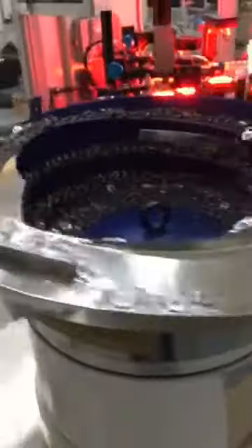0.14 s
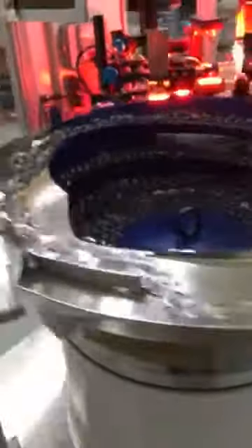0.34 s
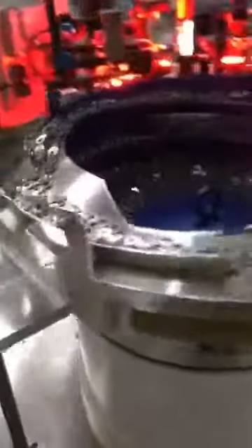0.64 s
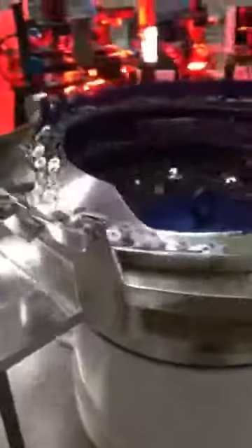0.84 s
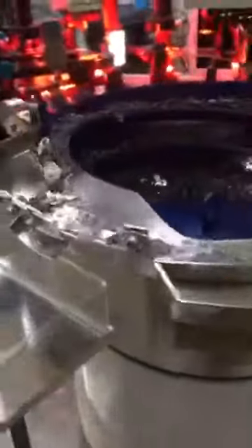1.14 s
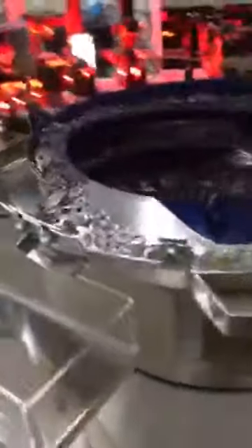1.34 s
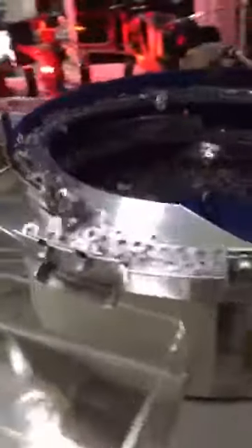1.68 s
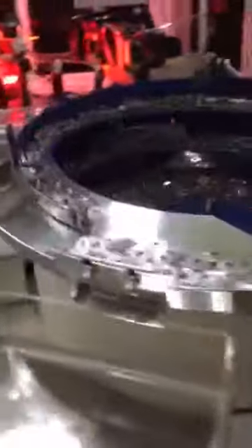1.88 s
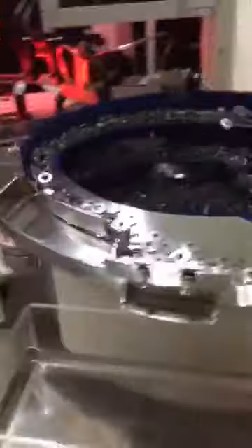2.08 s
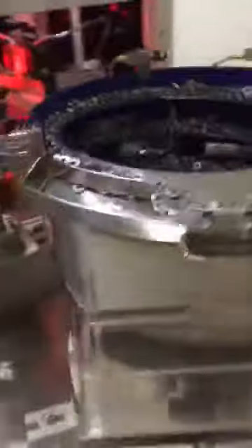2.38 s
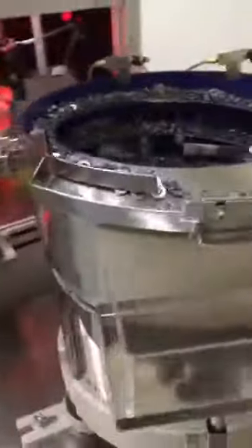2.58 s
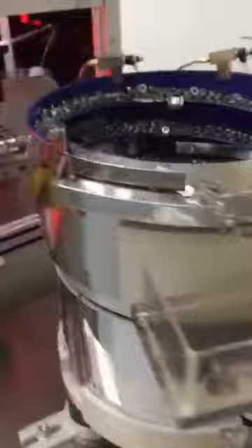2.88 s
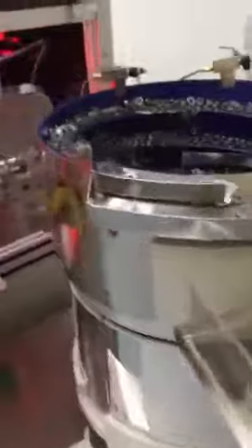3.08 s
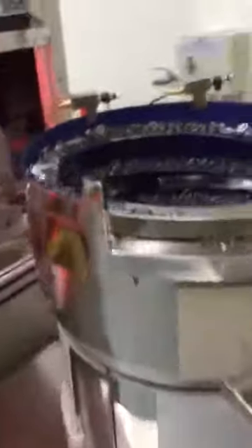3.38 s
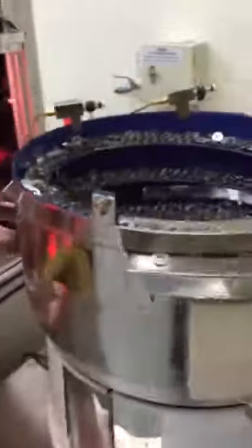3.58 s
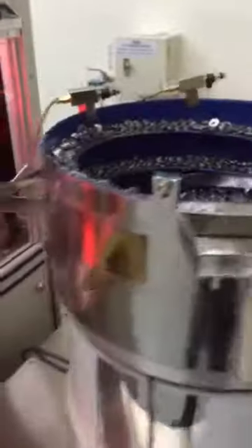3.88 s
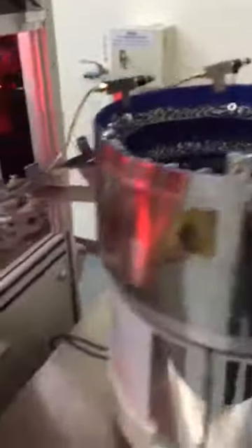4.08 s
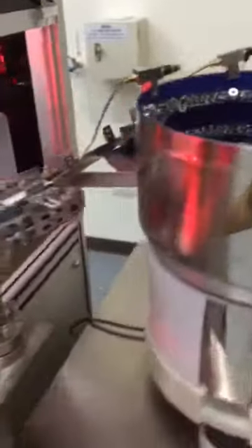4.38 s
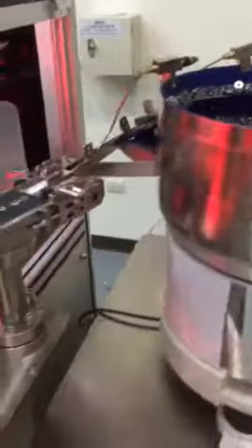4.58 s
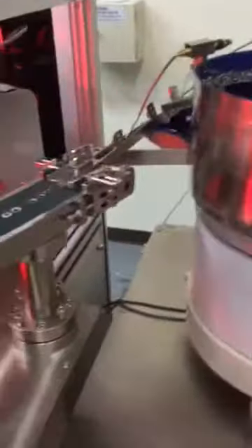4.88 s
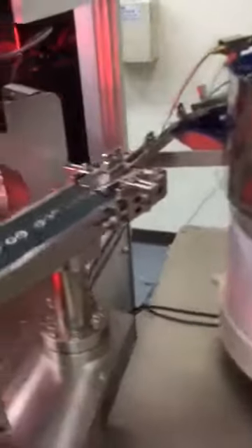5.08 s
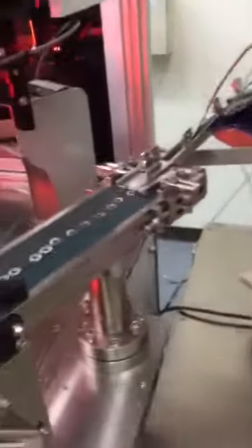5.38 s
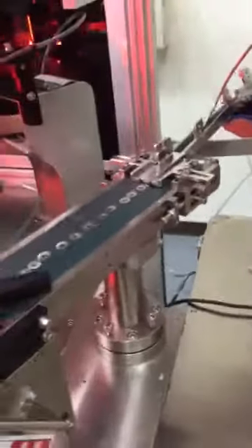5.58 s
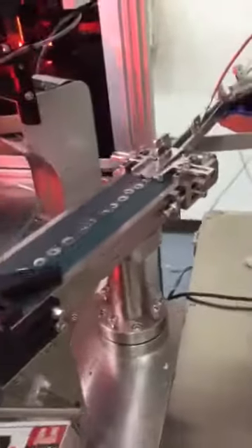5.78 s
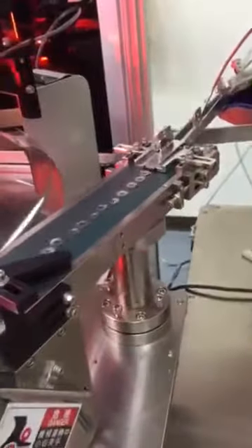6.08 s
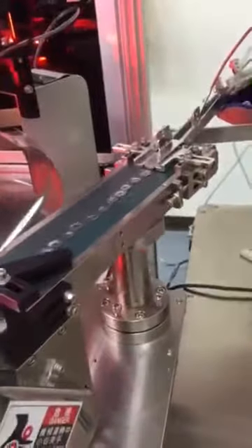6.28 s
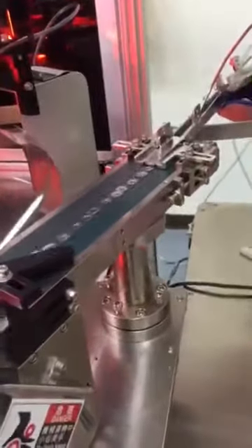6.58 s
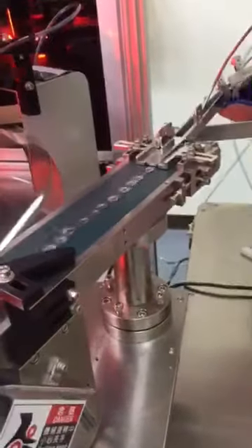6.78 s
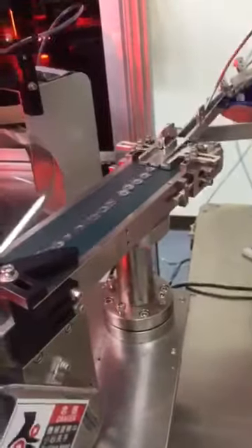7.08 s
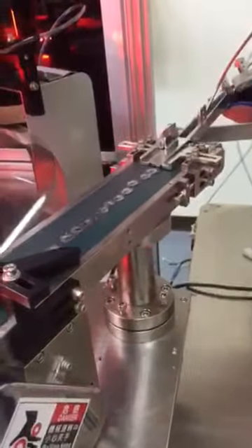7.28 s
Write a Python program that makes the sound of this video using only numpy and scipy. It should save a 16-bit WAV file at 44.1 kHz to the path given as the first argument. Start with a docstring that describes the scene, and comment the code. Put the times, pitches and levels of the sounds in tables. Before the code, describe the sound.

A vibrating bowl feeder hums steadily while hundreds of small metal washers rattle and clink under a bright hiss of air.

```python
"""A low hum and a busy metal clatter: a vibrating bowl is feeding washers in a factory hall.
Its magnet drive hums at multiples of the mains frequency. Hundreds of washers hop in time with it
and set the steel ringing, while air jets hiss over the track and the hall rumbles below.
Some washers drop hard; later come a dull bump and three low rustles. One microphone hears it all,
walking from the bowl's rim past its wall to the exit chute."""
import sys
import numpy as np
from scipy import signal
from scipy.fft import rfft, irfft, next_fast_len
from scipy.io import wavfile

SR = 44100
rng = np.random.default_rng(int(sys.argv[2]) if len(sys.argv) > 2 else 0)


def materialize(psi):
    """Save the field psi as 16-bit PCM at rate SR to the path in sys.argv[1].

    A 1-D psi becomes a single channel; in a 2-D psi each row is a channel.
    """
    bounded = np.clip(np.atleast_2d(psi).T, -1, 1)
    quanta = np.round(bounded * 32767).astype(np.int16)
    wavfile.write(sys.argv[1], SR, quanta)


N = 328532
TIME = np.arange(N) / SR
MAINS_HZ = 60
MAINS_PHASE = 2 * np.pi * MAINS_HZ * TIME


def from_db(db):
    """Turn decibels into a gain."""
    return 10 ** (np.asarray(db) / 20)


def rms_one(x):
    """Scale a signal so that its average level (rms) is 1."""
    return x / np.sqrt(np.mean(x ** 2) + 1e-20)


def drift(rate_hz):
    """A slow random wobble, about 1 in size."""
    r = np.exp(-80 * np.pi * rate_hz / SR)
    slow = signal.lfilter([1], [1, -2 * r, r * r], rng.standard_normal(N // 40 + 2002))[2000:]
    return np.interp(np.arange(N) / 40, np.arange(len(slow)), rms_one(slow))


def colour(x, spectrum):
    """Shape a signal's lows and highs by a tone curve; the result has rms 1."""
    size = next_fast_len(N)
    hz = np.maximum(np.arange(size // 2 + 1) * SR / size, 1)
    curve_hz, curve_db = np.transpose(spectrum)
    shape_db = np.interp(np.log(hz), np.log(curve_hz), curve_db, right=-60)
    return rms_one(irfft(rfft(x, size) * from_db(shape_db), size)[:N])


def resonate(x, hz, width_hz):
    """Make a signal ring at one pitch; a narrower width rings longer."""
    r = np.exp(-np.pi * width_hz / SR)
    feedback = [1, -2 * r * np.cos(2 * np.pi * hz / SR), r * r]
    return signal.lfilter(np.array([1, 0, -1]) * (1 - r * r) / 2, feedback, x + 1e-18)


# The hum's tones: (multiple of the mains, level/dB, share of the distance effect it follows)
HUM_TONES = [(1, -50.5, -.4), (2, -20, .99), (3, -58, .0), (4, -34.5, 0.13), (5, -58, 0.25),
             (6, -41.5, 0.9), (9, -67, .0), (10, -40, -0.037), (11, -48.5, 0.26), (13, -50.5, -0.23),
             (16, -48, -0.19), (17, -52, .0)]
# Loud and quiet spots made by standing waves: (multiple of the mains, place/m, width/m, change/dB)
HUM_SPOTS = [(4, 0.65, 0.19, -7.5), (4, 0.98, .04, 1), (6, .0, .03, 6), (6, 0.11, .07, -3),
             (6, 1.03, 0.058, 2.5), (10, .1, 0.077, 9), (10, .36, 0.16, -19), (10, 0.73, .15, -3),
             (10, 0.92, 0.16, 5.5), (10, 1.43, 0.055, 1.5), (11, 0.57, 0.13, 5.5), (11, 1.52, 0.025, 13),
             (13, 0.17, 0.12, 8.5), (13, 1.46, .02, 9.5), (16, .15, 0.15, 1.5), (16, .9, 0.11, 7.5),
             (16, 1.5, .07, 1), (17, .55, .12, 4.5), (17, 1.1, .1, 2)]

def magnet_hum(place_m, nearness_db):
    """The magnet pulls twice per mains cycle, so even multiples lead; slack parts add wavering highs."""
    out = 0
    for multiple, db, share in HUM_TONES:
        spot_db = sum(change_db * np.exp(-((place_m - at_m) / width_m) ** 2)
                      for tone, at_m, width_m, change_db in HUM_SPOTS if tone == multiple)
        level_db = db + share * nearness_db + spot_db + 0.26 * multiple * drift(13)
        phase = multiple * MAINS_PHASE + 0.031 * multiple * drift(6.5) + rng.uniform(0, 2 * np.pi)
        out = out + np.sqrt(2) * from_db(level_db) * np.sin(phase)
    return out


def washer_hops(per_s, spread_db, clump_db, echo_db):
    """Washers land as random clicks, bunched at each pull of the magnet and more at every other pull."""
    bunching = 1 + .25 * np.cos(2 * MAINS_PHASE) + .2 * np.cos(MAINS_PHASE)
    landed = rng.random(N) < per_s * bunching / SR
    sizes = from_db(spread_db * np.minimum(rng.exponential(1, N), 4)) * rng.choice([-1, 1], N)
    clicks = rms_one(landed * sizes * from_db(clump_db * drift(3.8)))
    echoes = rng.standard_normal(N)   # echoes off machines and walls blur into smooth noise
    return rms_one(clicks + from_db(echo_db) * echoes)


def washer_chinks(per_s, ring_s, top_hz):
    """Washers knock together and ring briefly, each knock at one of 40 pitches."""
    knocks = (rng.random(N) < per_s / SR) * from_db(7.0 * np.minimum(rng.exponential(1, N), 3))
    pitches = np.exp(rng.uniform(np.log(1500), np.log(top_hz), 40))
    washer = rng.integers(0, 40, N)
    width_hz = np.log(1000) / (np.pi * ring_s)   # fades 60 dB in ring_s
    return rms_one(sum(resonate(knocks * (washer == k), hz, width_hz) for k, hz in enumerate(pitches)))


# Tone curve of the landings: (f/Hz, relative level/dB)
CLATTER_CURVE = [(500, -31), (900, -25), (1300, -4), (1600, 1), (3000, 2), (4400, -1), (4950, -16),
                 (6000, -9), (10500, -30.5)]

def washer_clatter(nearness_db, surge_db):
    """Thousands of landings a second blend into a rattle, with softer chinks mixed in."""
    rattle = colour(washer_hops(4000, spread_db=4.5, clump_db=2.2, echo_db=2.5), CLATTER_CURVE)
    chinks = from_db(-5) * washer_chinks(700, ring_s=0.073, top_hz=9060)
    return from_db(-21 + 0.19 * nearness_db + surge_db) * rms_one(rattle + chinks)


# Rim, wall and chute: (loudest place/m, reach to a 6.9 dB drop/m, level/dB)
STEEL_PARTS = [(.2, 0.45, -21), (.95, 0.5, -25.5), (1.5, 0.47, -20.5)]
# The tones each part rings at: (f/Hz, width/Hz, relative level/dB)
RIM_TONES = [(1258, 26, -1), (1620, 42, -3), (1811, 24, 3.5), (2284, 64, -3.5), (2530, 64, -1.5),
             (2756, 80, -2.5), (3210, 57, -2.5), (3470, 41, -2.5), (3795, 72, -4), (4470, 160, -7.5),
             (5840, 140, -5.5), (6890, 75, -3.5), (7550, 83, -3.5), (8720, 510, -7)]
WALL_TONES = [(963, 29, -2.5), (1335, 39, 3.5), (1590, 65, 7), (2064, 50, 0), (2470, 80, -10),
              (2740, 110, -4.5), (3180, 75, -12), (4380, 230, -3.5), (5480, 260, -1), (6700, 130, -13),
              (8700, 880, -6.5)]
CHUTE_TONES = [(957, 28, -4.5), (1267, 34, 1.5), (1620, 56, -3), (2090, 65, 0.5), (2580, 100, -4),
               (3410, 48, -2), (5460, 120, -1), (6100, 150, -19), (8930, 330, -0.5), (9560, 450, -6.5)]

def ringing_steel(place_m, nearness_db, surge_db):
    """Landings ring each steel part; its tones swell and fade as washers pass their still points."""
    out = 0
    for (at_m, reach_m, db), tones in zip(STEEL_PARTS, (RIM_TONES, WALL_TONES, CHUTE_TONES)):
        strikes = washer_hops(5000, spread_db=2.5, clump_db=1.5, echo_db=-5)
        ring = sum((-1) ** k * from_db(tone_db + drift(10.5)) * resonate(strikes, hz, width_hz)
                   for k, (hz, width_hz, tone_db) in enumerate(tones))
        away_db = 6.9 * ((place_m - at_m) / reach_m) ** 2
        out = out + from_db(db + 0.75 * nearness_db + surge_db - away_db) * rms_one(ring)
    return out


# Tone curve of the hiss: (f/Hz, relative level/dB)
JET_CURVE = [(2000, -24), (4700, -6.5), (5400, -4), (7000, -5.5), (8000, -6.5), (8800, -4), (9500, -2.5),
             (10050, -4.5), (10400, -13.5)]

def air_jets(nearness_db):
    """Air blows over the track with a bright, nearly steady hiss."""
    level_db = -20.5 + 0.064 * nearness_db + .5 * drift(17)
    return from_db(level_db) * colour(rng.standard_normal(N), JET_CURVE)


# Tone curve of the rumble: (f/Hz, relative level/dB)
HALL_CURVE = [(20, -19), (40, -34), (60, 8), (100, -4.5), (200, 2.5), (450, -0.5), (700, 4), (880, 0),
              (1100, 2), (1600, 0.5)]

def hall_rumble():
    """The hall adds a low noise that wavers a little."""
    return from_db(-33.5 + 1.24 * drift(16)) * colour(rng.standard_normal(N), HALL_CURVE)


# Single washers that drop hard: (t/s, peak level/dB, ringing f/Hz)
HARD_DROPS = [(0.189, -8.5, 1820), (0.4478, -7, 1790), (0.5424, -7, 2615), (1.488, -10, 1730),
              (1.7514, -16, 1790), (1.8985, -9, 1740), (3.3496, -12, 1560), (3.4505, -11, 1560),
              (3.8488, -10, 3140), (4.2094, -7, 1410), (4.299, -11, 1590), (4.819, -9.5, 1620),
              (5.2565, -12, 4020), (5.2764, -15, 2840), (5.3377, -9, 2650), (5.4112, -9, 2120),
              (5.4448, -15, 1800), (5.509, -8, 2080), (5.6294, -12, 2090), (5.7786, -9.5, 2100),
              (6.0076, -17, 2100), (6.086, -12, 2090), (7.0108, -6, 1280), (7.3936, -19, 2070)]

def washer_drops():
    """Each drop is a short burst of bounces, partly ringing at the pitch of the spot it hits."""
    out, t = np.zeros(N), np.arange(int(.08 * SR)) / SR
    band = signal.butter(1, [1300, 6000], "band", fs=SR, output="sos")
    for start_s, db, hz in HARD_DROPS:
        bounces = rng.standard_normal(len(t)) * from_db(-60 * t / 0.17)
        burst = signal.sosfilt(band, bounces) + from_db(9) * resonate(bounces, hz, width_hz=150)
        start = round(start_s * SR)
        out[start:start + len(t)] += from_db(db) * (burst / np.abs(burst).max())[:N - start]
    return out


def dull_bump(start_s, db, hz, fade_s):
    """One low tone swells quickly and dies away, losing 60 dB in fade_s."""
    t = np.maximum(TIME - start_s, 0)
    rise = np.minimum(t / 0.013, 1)
    return rise * from_db(db - 60 * t / fade_s) * np.sin(2 * np.pi * hz * t)


# When the rustles come: (t/s, length/s, level/dB)
RUSTLE_TIMES = [(4.69, .15, -34), (6.298, 0.35, -31.5), (6.923, 0.15, -33)]
# Their tone curve: (f/Hz, relative level/dB)
RUSTLE_CURVE = [(200, -31), (350, 8), (450, 3), (900, -4), (1300, -10)]

def low_rustles():
    """Short bursts of dull noise start quickly and fade."""
    gain = 0
    for start_s, length_s, db in RUSTLE_TIMES:
        rise = np.clip((TIME - start_s) / 0.018, 0, 1)
        fade = np.clip(1 - (TIME - start_s) / length_s, 0, 1) ** .5
        gain = gain + from_db(db) * rise * fade
    return gain * colour(rng.standard_normal(N), RUSTLE_CURVE)


# The microphone's walk: (t/s, place along the path/m, distance from the bowl/m)
MIC_WALK = [(0, 0.13, 0.54), (.5, 0.14, 0.53), (1.2, 0.14, 0.5), (1.9, 0.41, 0.46), (2.5, 0.53, 0.59),
            (3.25, 0.56, .59), (3.7, 0.68, 0.47), (4.3, 0.88, 0.59), (4.75, 1.1, 0.81), (5.8, 1.3, 0.9),
            (6.4, 1.4, 1.02), (7.45, 1.55, 0.94)]
# Surges of washers sliding along the track: (peak t/s, half length/s, rise/dB)
WASHER_SURGES = [(.2, 0.084, 2), (1.548, 0.15, 0.5), (2.148, 0.13, 1.5), (3.4, 0.17, 0.5), (3.795, 0.25, 1),
                 (7.0, 0.15, 0.5)]

def scene():
    """Add up what the walking microphone hears, the same in both channels."""
    walk_s, places, distances = np.transpose(MIC_WALK)
    place_m = np.interp(TIME, walk_s, places)
    distance_m = np.interp(TIME, walk_s, distances)
    nearness_db = -20 * np.log10(distance_m / .5)   # distance effect: 0 dB at half a metre
    surge_db = sum(db * np.exp(-((TIME - peak_s) / half_s) ** 2) for peak_s, half_s, db in WASHER_SURGES)
    metal = washer_clatter(nearness_db, surge_db) + ringing_steel(place_m, nearness_db, surge_db)
    background = air_jets(nearness_db) + hall_rumble()
    mono = magnet_hum(place_m, nearness_db) + metal + background + washer_drops()
    mono += dull_bump(start_s=4.685, db=-25, hz=62, fade_s=.22) + low_rustles()
    return np.stack([mono, mono])


def record(dry):
    """Round off the loudest peaks, then cut the highest treble steeply."""
    rounded = 1.272 * np.tanh(dry / 1.33)
    cutoff_hz = 10350
    return signal.sosfilt(signal.ellip(12, .5, 80, cutoff_hz, fs=SR, output="sos"), rounded)


dry = scene()
out = record(dry)
materialize(out)
```